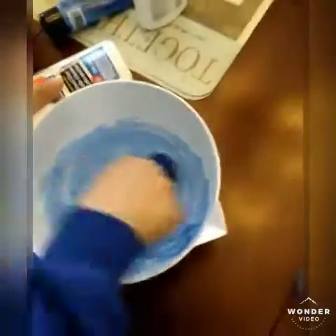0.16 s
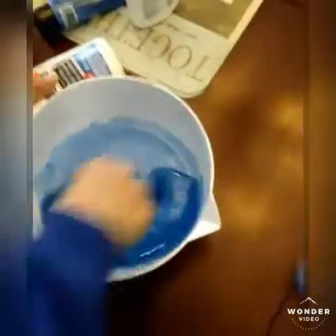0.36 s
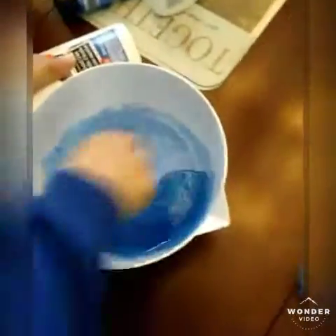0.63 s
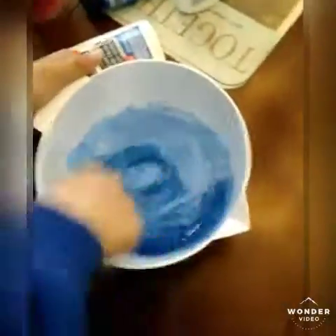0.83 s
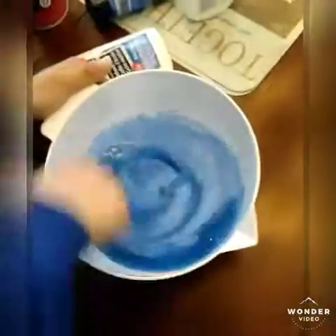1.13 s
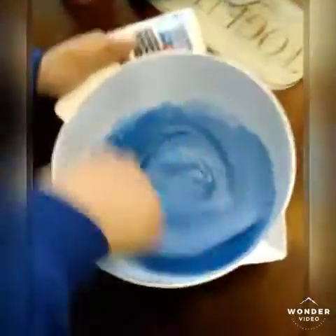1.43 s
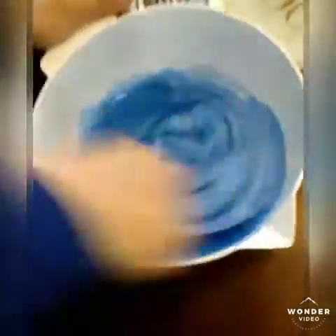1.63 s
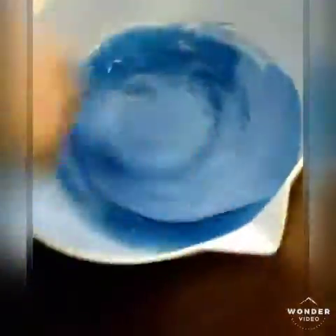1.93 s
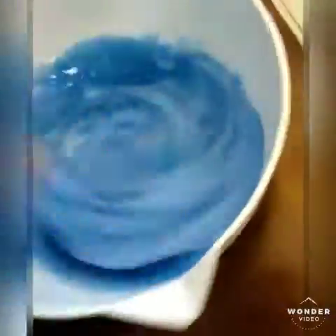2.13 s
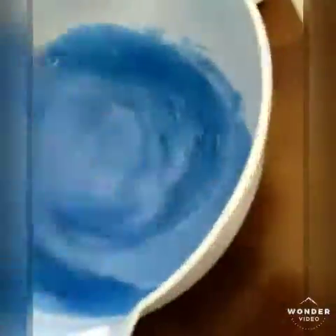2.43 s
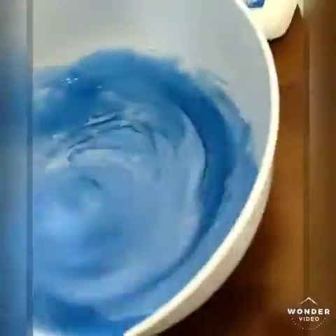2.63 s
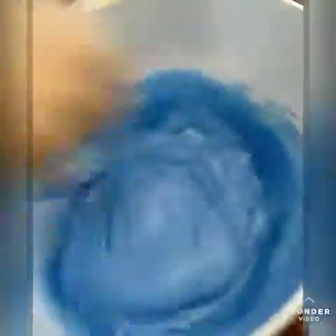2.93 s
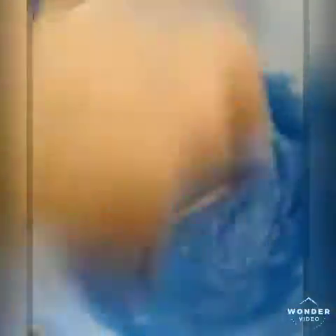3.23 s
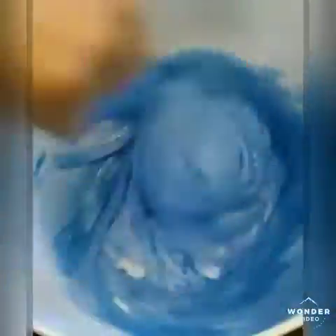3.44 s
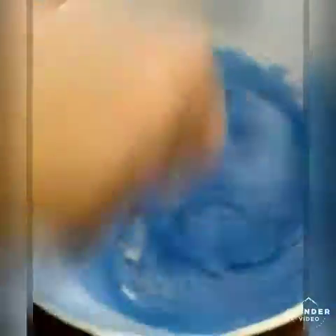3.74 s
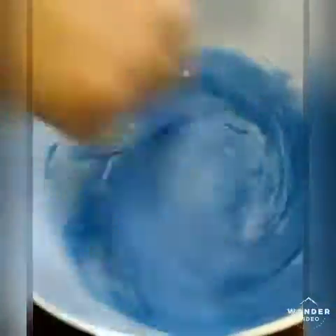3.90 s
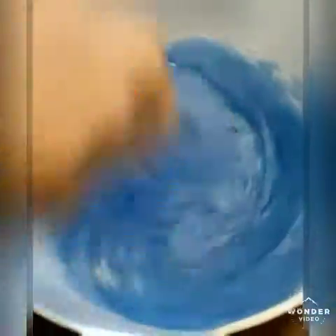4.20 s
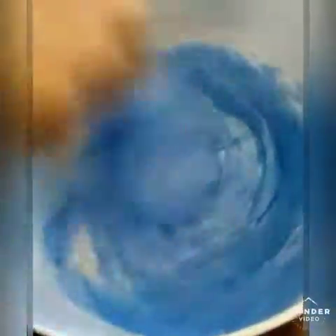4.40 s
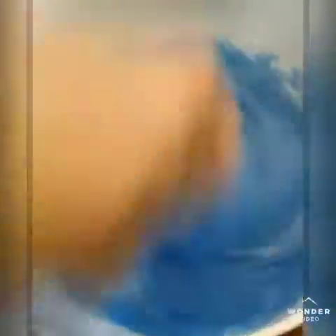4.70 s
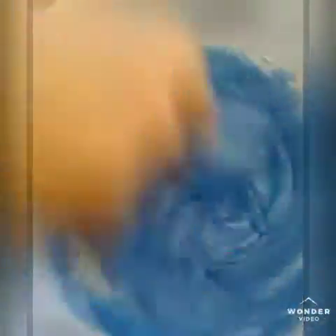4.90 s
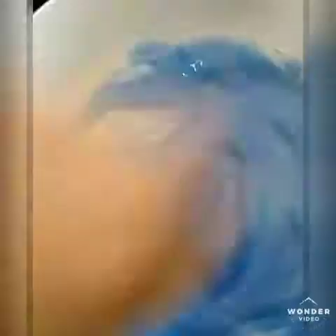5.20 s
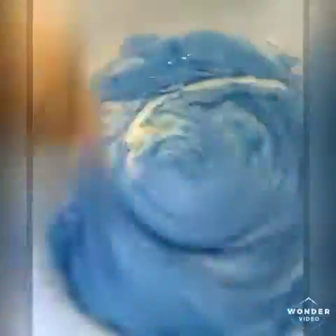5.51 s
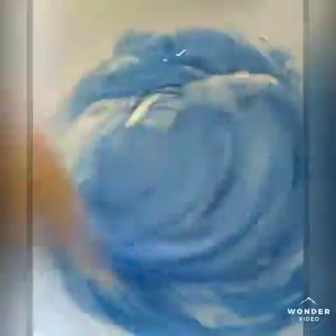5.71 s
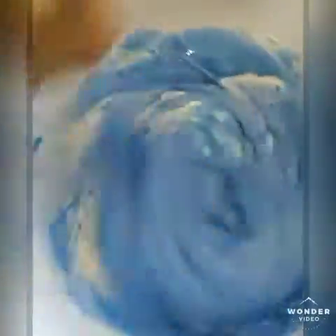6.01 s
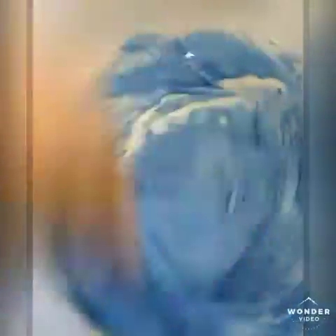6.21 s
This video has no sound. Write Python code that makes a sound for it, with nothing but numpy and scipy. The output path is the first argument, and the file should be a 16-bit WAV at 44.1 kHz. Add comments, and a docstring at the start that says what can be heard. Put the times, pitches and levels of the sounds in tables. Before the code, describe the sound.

A stick rapidly stirs thick slime in a plastic bowl, with wet squelches, sticky pops, crackles and dull knocks, close up indoors.

```python
"""On a table, close to a phone, a stick stirs thick slime in a plastic bowl, about four turns a second.
The stick knocks (ringing tones) and drags along the wall (noise bursts through the bowl's resonances).
The slime squelches and pops (swarms of short gliding tones); its threads snap (bursts of treble noise).
The bowl rocks (low noise); a faint room noise lies beneath, with a thin high buzz that fades early.
Two microphones a hand apart hear it with opposite polarity, together with the room's echo."""
import sys
import numpy as np
from scipy import signal
from scipy.fft import rfft, irfft, next_fast_len
from scipy.io import wavfile
from scipy.ndimage import uniform_filter1d, map_coordinates

SR = 44100
rng = np.random.default_rng(int(sys.argv[2]) if len(sys.argv) > 2 else 0)


def wrap_up_sound(samples):
    """Save the sound to the file named by the first command line argument, as 16-bit audio."""
    columns = np.atleast_2d(samples).T
    # keep every value between -1 and 1, then stretch to whole-number steps
    tamed = np.clip(columns, -1, 1)
    steps = np.round(tamed * 32767).astype(np.int16)
    wavfile.write(sys.argv[1], SR, steps)


def linear_from_db(decibels):
    """Turn decibels (scalar or array-like) into linear amplitude factors; 0 gives 1."""
    return 10 ** (np.asarray(decibels, float) / 20)


N = 280035  # length in samples

# knocks of the stick: [t/s, level/dB, then relative to that level:
# thud into the table/dB, hollow body/dB, hard tick/dB]
KNOCK_EVENTS = [(0.004, -34, -8, 4, -4), (0.014, -36, 5, 3, -30), (0.1207, -13.5, -33, -14.5, -9.5),
                (0.16, -20.5, -26, -27, -11), (0.392, -18, -25, -32, -10), (0.6, -28, -37, -4, -5),
                (0.6489, -14, -47, -5, -32), (0.6767, -18.5, 2.5, -9.5, -3), (0.889, -19.5, -20, -7.5, -13),
                (0.9328, -20.5, 4, 0, -17), (0.9706, -40, -7, -1, 21.5), (1.121, -29, -27.5, -6, -9),
                (1.1413, -18, 4.5, 0, -5.5), (1.153, -27.5, 7, 0.5, -17), (1.3621, -12, -40, -12, -11.5),
                (1.4076, -25.5, 2.5, -4, -18), (1.467, -38, -11, 2, 10), (1.6153, -20.5, -12, -13.5, -13),
                (1.649, -14.5, -16.5, -8.5, 0.5), (1.8597, -10, -12, -55, -26),
                (1.925, -16, -48, -16.5, -30), (2.0507, -16.5, -22, -22, -16.5),
                (2.0672, -15.5, -15, -10, -25), (2.083, -16.5, -37, -27, -28), (2.1053, -8, -47, -4, -7),
                (2.156, -19.5, -17, 3.5, -1.5), (2.368, -16, -4, -10, -25.5), (2.4605, -30, 4, -13, -41),
                (2.737, -17, -28, -12.5, -6.5), (2.8126, -25, -4, -12.5, -31), (3.094, -17.5, -3, -3, -6),
                (3.323, -18.5, -1, -67, -10), (3.5365, -25, -22, -12, -14), (3.5743, -18, -67, -11.5, 6.5),
                (3.8036, -31.5, 3.5, -6.5, -2.5), (3.9833, -29, -52, -7.5, -2.5),
                (4.0365, -10, -13, -7, -25), (4.272, -13, -66, -38, -15), (4.3402, -15, -65, -20, -17),
                (4.437, -37.5, -6, 1, 5), (4.689, -37.5, -22, -28, 0), (4.7411, -19, -19, -7, -37),
                (4.8433, -29, -27, -6, -1.5), (4.8871, -22, -21, -15, -8.5), (4.997, -14, -17, -12, -8.5),
                (5.0554, -30, -30, -7.5, -16), (5.071, -18.5, -33, -57, -16), (5.1001, -24, -18, -15, -4),
                (5.224, -9, -30.5, -9.5, -8.5), (5.2535, -19, -9, 0, -16),
                (5.3485, -14.5, -3.5, -13.5, -15), (5.4118, -11.5, -4, -3, -6),
                (5.437, -3.5, -68, -18, -2.5), (5.687, -33, -58, -13, -26), (5.8537, -30, -16, -10.5, -26),
                (5.908, -24.5, -25, -9.5, -37), (6.108, -21.5, -15.5, -6, 1.5),
                (6.2291, -28, -21, -23, -39), (6.3038, -37, -22, 6, 12)]
# ringing modes of the bowl: [f/Hz, level/dB, time to fall by 60 dB/s]
BOWL_MODES = [(114, -19, 0.2), (215.4, -15, 0.22), (276, 0, 0.056), (530.6, 2, 0.029), (661.6, 9, 0.018),
              (783, -3.5, 0.0049), (1272, -0.5, 0.022), (1996, -4.5, 0.016), (2697, -5, 0.013),
              (3034, -6.5, 0.013), (3884, -20.5, 0.027), (4760, -18.5, 0.013)]


def unit(x):
    """Scales a sound to rms 1."""
    return x / np.sqrt(np.mean(x ** 2) + 1e-20)


def along(points, hz):
    """Reads a value at each frequency from (Hz, value) points, on a log frequency axis."""
    f, value = np.transpose(points)
    return np.interp(np.log(hz + 1), np.log(f + 1), value)


def curves(rows):
    """Draws one value per sample for each column after the time."""
    s, *columns = np.transpose(rows)
    return [np.interp(np.arange(N) / SR, s, column) for column in columns]


def wobble(rate):
    """Draws a smooth random curve through `rate` random points a second."""
    points = rng.standard_normal(int(N * rate / SR) + 4)
    return map_coordinates(points, [np.arange(N) * rate / SR])


def filtered(x, response):
    """Multiplies the spectrum of x by a response, a function of frequency in Hz."""
    m = next_fast_len(N + SR // 2)
    return irfft(rfft(x, m) * response(np.fft.rfftfreq(m, 1 / SR)), m)[..., :N]


def grains(rate, spread_db, life_s):
    """Random slips, `rate` a second: fading noise bursts of scattered size, as two unrelated versions."""
    size = linear_from_db(spread_db * np.minimum(rng.exponential(size=N), 4))
    slips = (rng.random(N) < rate / SR) * size
    shape = signal.lfilter([1], [1, -np.exp(-1 / (life_s * SR))], slips)
    return shape * rng.standard_normal((2, N))


def wall(hz, damping):
    """The bowl's response: a resonance per mode, wider the faster it dies; damping widens them all."""
    response = 0
    for k, (centre, db, t60) in enumerate(BOWL_MODES):
        width = damping * np.log(1000) / (np.pi * t60)  # Hz
        resonance = 1j * hz * width / (centre * centre - hz * hz + 1j * hz * width)
        response = response + (-1) ** k * linear_from_db(db) * resonance
    return response


def stirring():
    """The bowl rocks as low noise, the stick judders along the wall, the slime film tears and crackles."""
    # stirring over time: [t/s, rocking level/dB, drag on the wall level/dB]
    stir_levels = [(0.0, -25, -42.5), (0.09, -36.5, -44), (0.39, -41.5, -49), (0.54, -41.5, -47.5),
                   (0.85, -38.5, -39.5), (0.99, -45.5, -55), (1.36, -44, -49.5), (1.7, -44, -53.5),
                   (2.0, -46.5, -53), (2.2, -41, -52.5), (2.34, -50, -66), (2.42, -46, -59),
                   (2.62, -51.5, -53), (2.93, -43.5, -55), (3.7, -57, -62.5), (4.19, -43.5, -53.5),
                   (4.56, -55.5, -60.5), (5.27, -46.5, -46), (5.52, -76, -57), (5.64, -77.5, -72.5),
                   (5.92, -69, -56.5), (6.35, -51, -58.5)]
    # colour of the rocking: [f/Hz, level/dB]
    rock_colour = [(25, -17), (70, -12.5), (125, 2), (170, -5), (240, -6), (330, -8), (500, -15),
                   (900, -51.5)]
    # colour of the tearing film: [f/Hz, level/dB]
    wet_colour = [(1200, 8), (2200, -7.5), (3000, 2), (4100, 4), (5000, 1), (8000, 1), (12000, 2),
                  (15200, 0.5), (16500, -35)]
    rock_db, drag_db = curves(stir_levels)
    wet_db = -57.5 + 0.85 * (drag_db + 56.5)  # the film follows the drag

    unsteady = linear_from_db(1.2 * wobble(25) + 1.2 * wobble(7))
    rock = filtered(unsteady * rng.standard_normal((2, N)), lambda hz: linear_from_db(along(rock_colour, hz)))
    judder = grains(rate=270, spread_db=-1.0, life_s=0.0064)
    drag = filtered(judder, lambda hz: wall(hz, damping=1.0) * hz ** 2 / (hz ** 2 + 400 ** 2))
    film = grains(rate=900, spread_db=3, life_s=0.004)
    wet = filtered(film, lambda hz: linear_from_db(along(wet_colour, hz)))
    lumps = wobble(35)

    # each thud sets the bowl rocking harder for a while
    shake_db, shake_t60_s = -11, 0.21
    s, db, thud = np.transpose(KNOCK_EVENTS)[:3]
    kicks = np.bincount(np.round(s * SR).astype(int), linear_from_db(db + thud + shake_db), N)
    shaken = signal.lfilter([1], [1, -linear_from_db(-60 / (shake_t60_s * SR))], kicks)

    rocking = (linear_from_db(rock_db) + shaken) * unit(rock)
    dragging = linear_from_db(drag_db + 0.8 * lumps) * unit(drag)
    tearing = linear_from_db(wet_db + 2.0 * lumps) * unit(wet)
    return rocking + dragging + tearing


def blips(s, size, hz, cycles, glide):
    """Short gliding tones with a soft start, as two versions a random phase apart."""
    t = np.arange(SR // 60) / SR
    age = t * (hz / cycles)[:, None]  # in lifetimes
    turn = 2 * np.pi * hz[:, None] * t * (1 + glide[:, None] * np.minimum(age, 3))
    at = (np.round(s * SR).astype(int)[:, None] + np.arange(len(t))).ravel()
    shift = rng.uniform(0, 2 * np.pi, (len(s), 1))
    shape = size[:, None] * age * np.exp(1 - age)
    versions = [(shape * np.sin(turn + phase)).ravel() for phase in (0, shift)]
    return np.array([np.bincount(at, version, N + SR)[:N] for version in versions])


def bubbles(count, hz, octaves, cycles, spread_db, hiss):
    """A swarm of tiny air pockets of scattered pitch and size, on a bed of hiss around the same pitch."""
    when, big = rng.random((2, count))
    pitch, glide = rng.standard_normal((2, count))
    size = linear_from_db(-spread_db * np.log(big + 0.0049))
    pocket_hz = np.minimum(hz * 2 ** (octaves * pitch), SR / 3)
    swarm = blips(when * N / SR, size, pocket_hz, cycles, 0.025 * glide)
    noise = rng.standard_normal((2, N))
    bed = filtered(noise, lambda f: np.exp(-(np.log2((f + 1) / hz) / octaves / 2) ** 2))
    return unit(unit(swarm) + hiss * unit(bed))


def popping():
    """Single air pockets burst as gliding tones, each with four more, mostly fainter, just after it."""
    # the loudest bursting pockets: [t/s, level/dB, f/Hz]
    pop_events = [(0.165, -20, 2810), (0.311, -32.5, 3770), (0.613, -23.5, 3100), (0.679, -18.5, 6200),
                  (0.691, -21, 650), (0.8124, -29, 734), (0.906, -15.5, 4760), (0.9798, -32, 640),
                  (1.199, -29, 3230), (1.292, -25.5, 1020), (1.375, -27, 2770), (1.617, -24, 3820),
                  (1.6276, -20.5, 323), (1.634, -42, 3600), (1.727, -42, 1050), (1.867, -23.5, 1350),
                  (1.8887, -26.5, 1270), (1.955, -31.5, 5070), (2.1243, -13, 3170), (2.136, -12.5, 3670),
                  (2.129, -13, 4800), (2.148, -19, 700), (2.3186, -37.5, 2050), (2.494, -43, 1300),
                  (2.512, -32, 4570), (2.595, -39, 4270), (2.868, -31.5, 6650), (2.884, -35, 1250),
                  (3.046, -30.5, 430), (3.178, -28.5, 740), (3.342, -25.5, 406), (3.401, -35, 3440),
                  (3.4264, -32, 610), (3.476, -28, 3860), (3.542, -24.5, 4260), (4.081, -33, 2180),
                  (4.113, -27.5, 403), (4.149, -32, 2950), (4.275, -17.5, 6300), (4.409, -34, 420),
                  (4.644, -36.5, 3900), (4.643, -39, 550), (4.6624, -42, 3030), (4.778, -29, 4760),
                  (4.9312, -33, 730), (5.1182, -27, 450), (5.244, -25, 2600), (5.283, -23, 2570),
                  (5.672, -49.5, 650), (6.139, -36.5, 410), (6.2392, -31, 800)]
    s, db, hz = np.transpose(pop_events)
    cycles = 1.25 * (hz / 1000) ** 0.7  # higher pockets ring for more cycles
    glide = 0.02 * rng.standard_normal(len(s))
    pops = blips(s, linear_from_db(db), hz, cycles, glide)

    late, off, small = rng.standard_normal((len(s) * 4, 3)).T
    s, db, hz, cycles, glide = [np.repeat(v, 4) for v in (s, db, hz, cycles, glide)]
    spatter_s, spatter_octaves, spatter_db = 0.006, 0.6, -7
    when = s + spatter_s * np.abs(late)
    size = linear_from_db(db + spatter_db + 2 * small)
    return pops + blips(when, size, hz * 2 ** (spatter_octaves * off), cycles, glide)


def squelching():
    """Each cut of the stick through the slime swells a swarm of bubbles, fast at first, then trailing off."""
    # cuts through the slime: [t/s, length/s, crackle level/dB, depth (gurgle over crackle)/dB]
    cuts = [(0.0, 0.061, -62.5, 20.5), (0.073, 0.05, -39.5, -3.5), (0.119, 0.012, -34, 7.5),
            (0.148, 0.046, -39, 1.5), (0.299, 0.2, -50, 1.5), (0.318, 0.106, -47.5, -6),
            (0.559, 0.11, -47, -0.5), (0.596, 0.036, -38, 0), (0.65, 0.05, -32, 1.5),
            (0.888, 0.041, -32, -3), (0.93, 0.066, -45, 1.5), (1.123, 0.097, -42, 5),
            (1.288, 0.061, -53.5, 19.5), (1.355, 0.027, -33.5, -2), (1.393, 0.043, -34, -1),
            (1.438, 0.039, -42, -1), (1.616, 0.11, -43.5, 0), (1.86, 0.089, -37.5, -2),
            (1.928, 0.061, -41.5, -3.5), (2.107, 0.046, -30, 2.5), (2.16, 0.09, -58, 16),
            (2.367, 0.0077, -72, 32), (2.483, 0.045, -50, 1.5), (2.8, 0.11, -49, 0),
            (3.098, 0.012, -32.5, 0), (3.324, 0.044, -44.5, 4), (3.418, 0.036, -44.5, -5),
            (3.465, 0.068, -54, 2), (3.538, 0.039, -37.5, -3), (3.815, 0.021, -45, 5),
            (3.915, 0.016, -45, 0.5), (3.961, 0.033, -48.5, -4), (4.041, 0.06, -41, 2),
            (4.128, 0.042, -45, -3), (4.233, 0.081, -41.5, 1.5), (4.251, 0.04, -31.5, -19),
            (4.496, 0.069, -54, -1), (4.739, 0.043, -36.5, -3.5), (4.999, 0.027, -44.5, 4),
            (5.048, 0.086, -44.5, -6), (5.233, 0.035, -32.5, 2.5), (5.271, 0.032, -37.5, -5),
            (5.339, 0.068, -50, 6.5), (5.404, 0.02, -35, -8), (5.411, 0.0096, -49, 1),
            (5.68, 0.026, -51.5, -3), (5.911, 0.036, -44, -17), (6.086, 0.074, -55, -3),
            (6.168, 0.028, -49.5, -12), (6.23, 0.062, -52.5, -12), (6.304, 0.017, -34, -0.5)]
    rises_s = [0.017, 0.019, 0.0077]  # crackle, fizz, gurgle
    sag_db, trail_s, trail_db = -2.5, 0.025, -52.5
    t, power = np.arange(N) / SR, np.zeros((3, N))
    for s, length, db, depth in cuts:
        shape_db = [trail_db, 0, sag_db, trail_db]
        burst_db = [np.interp(t, [s - rise, s, s + length, s + length + trail_s], shape_db)
                    for rise in rises_s]
        fizz_db = -48.5 - 0.24 * depth + (db + 43)  # deep cuts fizz less
        power += linear_from_db(np.array([[db], [fizz_db], [db + depth]]) + burst_db) ** 2

    # the slime keeps settling after each squelch
    linger_s, linger_db = 0.049, -13.5
    keep = np.exp(-1 / (linger_s * SR))
    power += linear_from_db(linger_db) ** 2 * signal.lfilter([1 - keep], [1, -keep], power)

    # the slime tears in fits: mostly shared, partly each layer's own
    own = np.array([wobble(45), wobble(35), wobble(45)])
    fits_db = 2.6 * wobble(90) + 2.26 * wobble(260) + 0.75 * own
    crackle, fizz, gurgle = np.sqrt(power) * linear_from_db(np.minimum(fits_db, 5.5))

    # the cavity behind the stick opens and closes: the gurgle drifts between two pitches
    deep = np.pi / 4 * (1 + np.tanh(1.56 * wobble(12)))
    low, high = gurgle * np.sin(deep), gurgle * np.cos(deep)
    return (popping()
            + crackle * bubbles(count=3000, hz=2927, octaves=0.577, cycles=2.22, spread_db=4.0, hiss=1.0)
            + fizz * bubbles(count=4000, hz=8660, octaves=0.637, cycles=1.45, spread_db=3.5, hiss=0.76)
            + low * bubbles(count=2200, hz=680, octaves=0.36, cycles=1.7, spread_db=2.7, hiss=0.8)
            + high * bubbles(count=2600, hz=1250, octaves=0.3, cycles=2.3, spread_db=2.7, hiss=0.8))


def air():
    """Room quiet and microphone noise as coloured noise; the buzz as pulsing noise in a narrow band."""
    # colour of the quiet: [f/Hz, level/dB]
    air_colour = [(30, 22), (120, 19), (500, 10.5), (1230, -40), (1700, -45), (2400, -19), (4000, -7),
                  (9000, -39), (15500, -7)]
    # the buzz over time: [t/s, level/dB]
    buzz_levels = [(0, -53), (0.49, -57.5), (0.56, -76), (0.64, -53.5), (1.5, -61), (3.2, -77)]
    quiet = filtered(rng.standard_normal((2, N)), lambda hz: linear_from_db(along(air_colour, hz)))
    pulses_per_s = 160 * (1 + 0.013 * wobble(7.4))
    beat = 1 + 0.56 * np.sin(2 * np.pi * np.cumsum(pulses_per_s) / SR)
    thin = filtered(beat * rng.standard_normal((2, N)), lambda hz: 1 / (1 + ((hz - 8990) / 400) ** 2))
    buzz_db = curves(buzz_levels)[0] + 1.6 * wobble(27)
    return linear_from_db(-60.5 + 0.82 * wobble(8)) * unit(quiet) + linear_from_db(buzz_db) * unit(thin)


def knocks():
    """Each knock rings the bowl's modes as fading sines at new strengths and adds a wet tick of noise."""
    # centres of a knock's parts: thud, body, middle, upper modes [f/Hz]
    part_hz = [200, 650, 1400, 3600]
    out, t = np.zeros((2, N + SR)), np.arange(SR // 6) / SR
    hz, level_db, t60 = np.transpose(BOWL_MODES)[:, :, None]
    for s, db, thud, body, tick in KNOCK_EVENTS:
        # the upper modes ring 11 dB above the tick setting
        colour_db = along(np.transpose([part_hz, [thud, body, 0, tick + 11]]), hz)
        pitch = hz * (1 + 0.035 * rng.standard_normal(hz.shape))  # the slime load shifts the modes
        uneven_db = 2.13 * rng.standard_normal((2, *hz.shape))
        size = linear_from_db(level_db + colour_db + uneven_db - 60 * t / t60)
        phase = [[[0]], [[1]]] * rng.uniform(0, 2 * np.pi, hz.shape)  # differs between the two versions
        ring = np.sum(size * np.sin(2 * np.pi * pitch * t + phase), axis=1)
        ring *= 1 - np.exp(-(t / 0.00068) ** 2)  # slime cushions the contact
        noise = signal.lfilter([1, 0, -1], [1, -0.45], rng.standard_normal((2, len(t))))
        wet_tick = linear_from_db(tick - 60 * t / 0.0059) * (1 - np.exp(-t / 0.00057)) * noise
        out[:, round(s * SR):][:, :len(t)] += linear_from_db(db) * (ring + wet_tick)
    return out[:, :N]


def snaps():
    """Threads of slime snap: very short bursts of treble noise."""
    # snapping threads: [t/s, level/dB]
    snap_events = [(0.0874, -26), (0.1136, -30), (0.1714, -29), (0.611, -32), (0.6667, -12.5),
                   (0.9026, -18.5), (1.165, -38), (1.1985, -27), (1.246, -27.5), (1.376, -21.5),
                   (1.3938, -21), (1.7143, -38), (1.886, -16), (1.902, -15), (1.943, -21), (1.9544, -30),
                   (2.466, -34), (2.492, -27.5), (2.509, -32.5), (2.6664, -37), (2.696, -29),
                   (2.7987, -26.5), (2.8054, -34), (2.866, -28), (2.878, -32), (2.8998, -38),
                   (2.9417, -38.5), (3.101, -13), (3.205, -30.5), (3.4276, -33), (3.484, -32),
                   (3.6232, -34), (3.927, -36), (4.1, -31), (4.2294, -23), (4.259, -11), (4.358, -24.5),
                   (4.427, -37), (4.49, -38), (4.515, -33), (4.545, -29.5), (4.7413, -23.5), (4.751, -27),
                   (4.762, -21), (4.781, -29), (4.882, -30), (5.02, -33), (5.241, -18), (5.2826, -18),
                   (5.304, -28), (5.363, -26.5), (5.942, -44)]
    t60_s, low_hz = 0.016, 3900
    s, db = np.transpose(snap_events)
    kicks = np.bincount(np.round(s * SR).astype(int), linear_from_db(db), N)
    fading = signal.lfilter([1], [1, -linear_from_db(-60 / (t60_s * SR))], kicks)
    shape = uniform_filter1d(fading, size=100)
    return filtered(shape * rng.standard_normal((2, N)), lambda hz: hz ** 4 / (hz ** 4 + low_hz ** 4))


def room(x):
    """The room answers with a tail of noise in which each frequency dies at its own speed."""
    # how long the room rings: [f/Hz, time to fall by 60 dB/s]
    ring_times = [(150, 0.089), (800, 0.2), (1250, 0.26), (1800, 0.092), (4000, 0.14), (12000, 0.15)]
    hz, t, z = signal.stft(rng.standard_normal((2, SR // 2)), SR, nperseg=256)
    fading = z * linear_from_db(-60 * t / along(ring_times, hz)[:, None])
    tail = signal.istft(fading, SR, nperseg=256)[1]
    late = np.pad(x, ((0, 0), (130, 0)))  # the echo starts 130 samples later
    return signal.fftconvolve(late, tail / np.linalg.norm(tail[0]), axes=1)[:, :N]


def microphones(pair):
    """The far, later, inverted microphone combs the sum and the difference at alternate frequencies."""
    # likeness of the sum and the difference: [f/Hz, likeness 0-1]
    likeness = [(100, 0.72), (600, 0.6), (1850, 0.31), (3100, 0.22), (4400, 0.29), (7000, 0.58),
                (10000, 0.21), (14000, 0.38)]
    # depth of the comb's notches: [f/Hz, depth 0-1]
    notch_depth = [(100, 0.6), (1200, 0.75), (2500, 0.74), (3800, 0.58), (5000, 0.43), (7500, 0.34),
                   (15000, 0.18)]
    # left over right: [f/Hz, level/dB]
    balance = [(100, -2), (250, -5.5), (650, 2.5), (1100, -1.5), (1600, -3.5), (2500, 1.5), (5000, -2.5),
               (14000, -3.5)]
    lag_s = 0.0003933  # the far microphone hears later

    def mixing(hz):
        alike = np.clip(along(likeness, hz), 0, 1)
        return np.array([alike, np.sqrt(1 - alike ** 2)])

    def combs(hz):
        behind = 2 * np.pi * hz * lag_s + 1.8 * np.exp(-hz / 500)  # radians; the bass lags further
        depth = np.clip(along(notch_depth, hz), 0, 1)
        far = depth * np.exp(-1j * behind)
        return np.array([1 - far, 1 + far]) / np.sqrt(2 + 2 * depth ** 2)

    other = filtered(pair, mixing).sum(axis=0)  # only partly like the first
    mid, side = filtered(np.array([pair[0], other]), combs)
    left_right = np.array([mid + side, mid - side]) / np.sqrt(2)
    return filtered(left_right, lambda hz: linear_from_db(along(balance, hz) * [[0.5], [-0.5]]))


def scene():
    """The bowl, heard directly and from the room, over the quiet air."""
    bowl = stirring() + squelching() + knocks() + snaps()
    echo = linear_from_db(-15.5) * room(bowl)
    return microphones(bowl + echo + air())


def roll_off(x):
    """The treble ends steeply here."""
    return signal.sosfilt(signal.butter(12, 16510, fs=SR, output="sos"), x)


def record(dry):
    """The phone trims both ends of the spectrum and bends peaks smoothly below full scale."""
    # the phone's response: [f/Hz, level/dB]
    phone_response = [(30, -15), (75, -8.5), (115, 2), (14800, -1), (15500, -5), (16300, -36)]
    heard = filtered(dry, lambda hz: linear_from_db(along(phone_response, hz)))
    limited = heard / (1 + np.abs(heard) ** 8) ** (1 / 8)
    return roll_off(limited)


dry = scene()
out = record(dry)
wrap_up_sound(out)
```